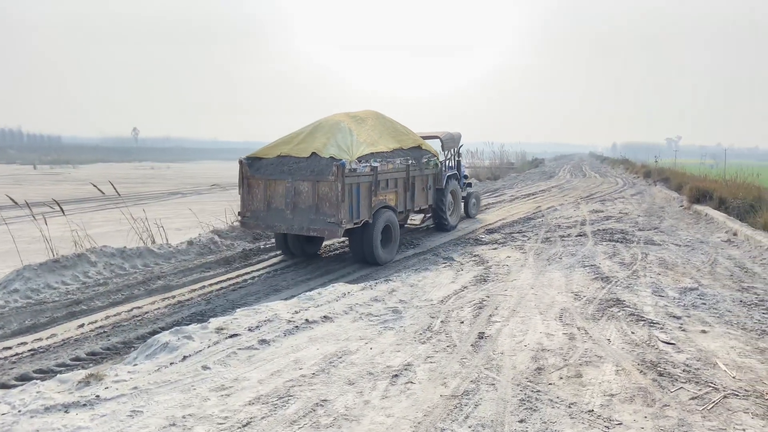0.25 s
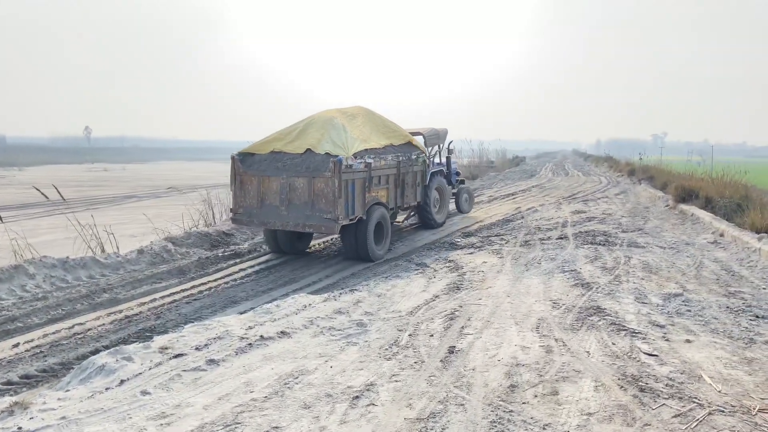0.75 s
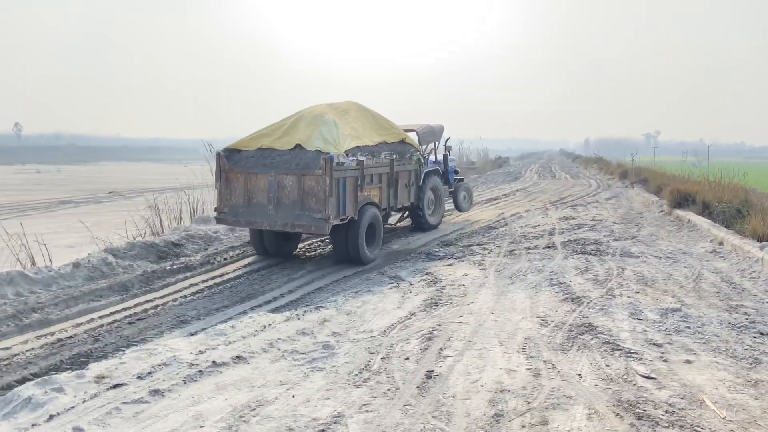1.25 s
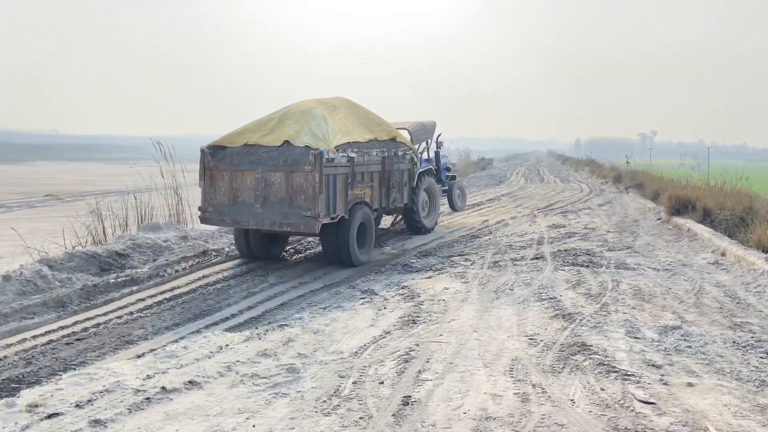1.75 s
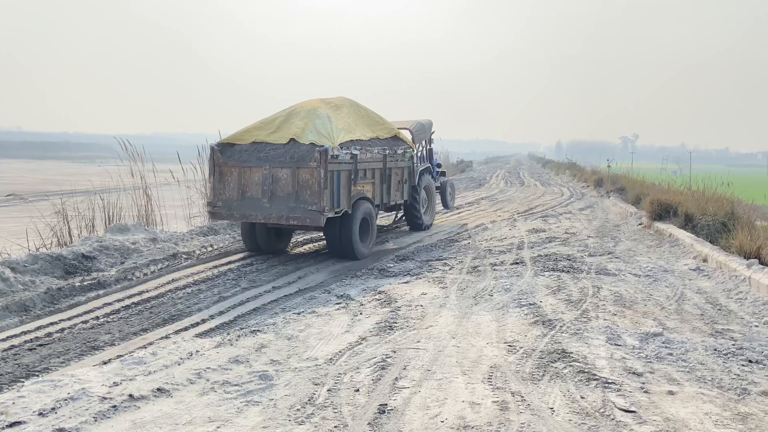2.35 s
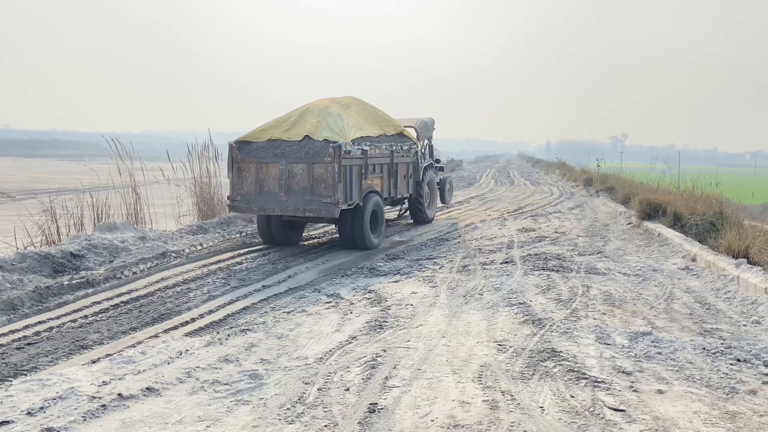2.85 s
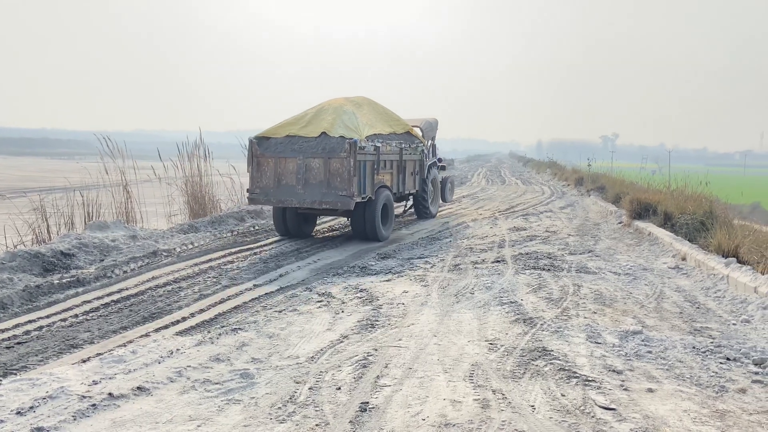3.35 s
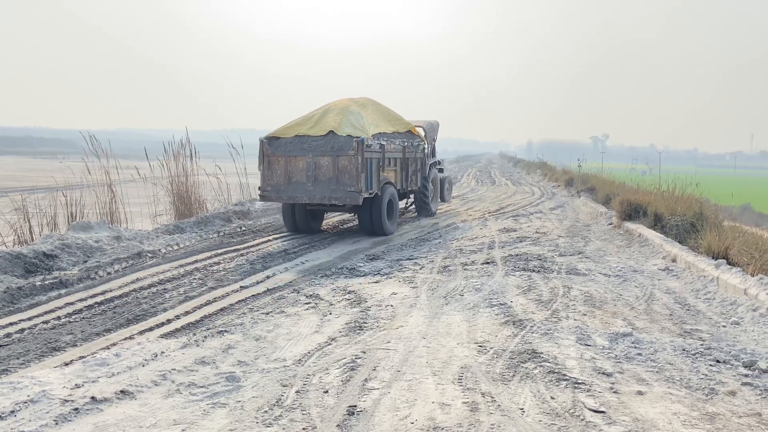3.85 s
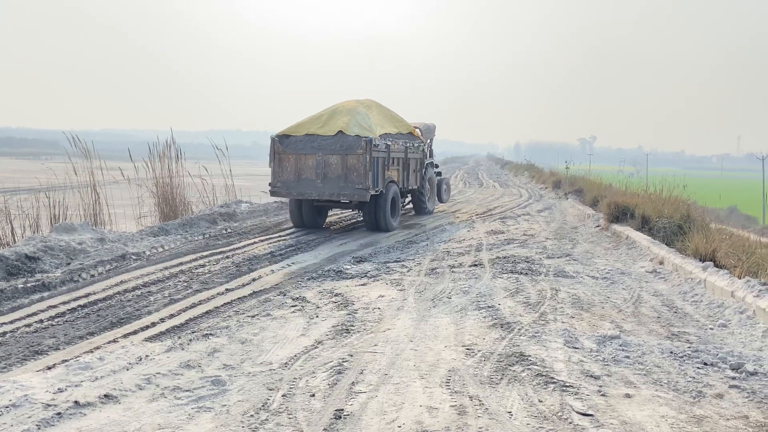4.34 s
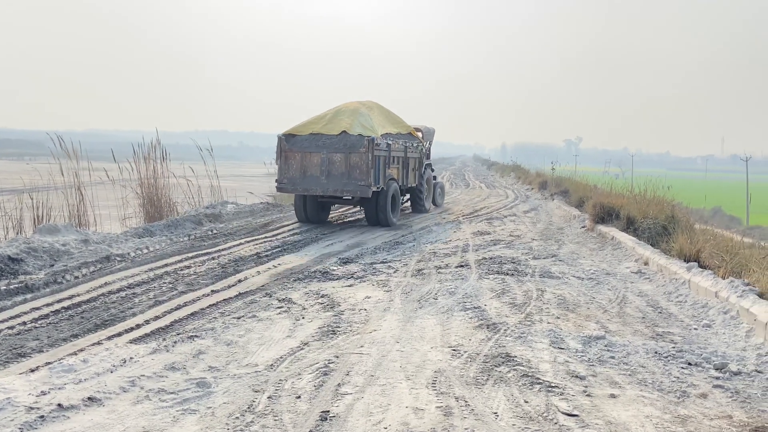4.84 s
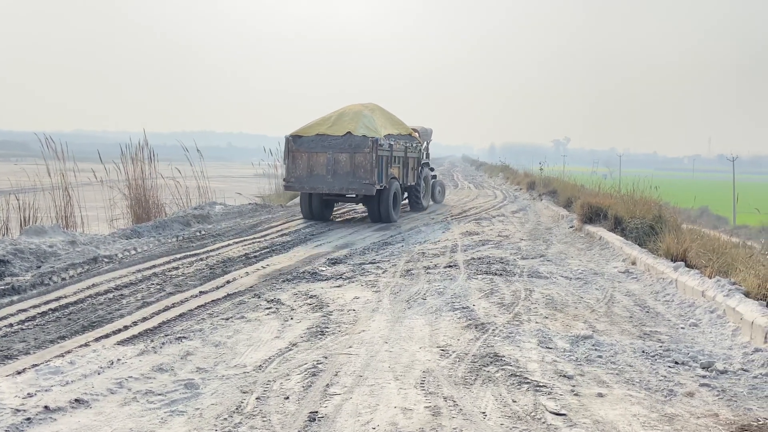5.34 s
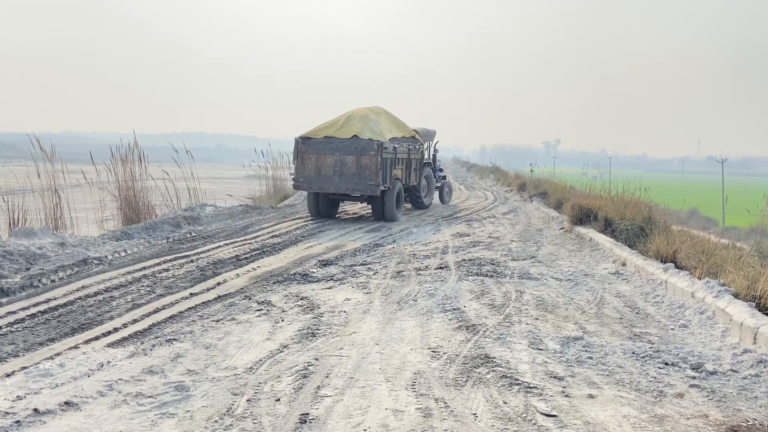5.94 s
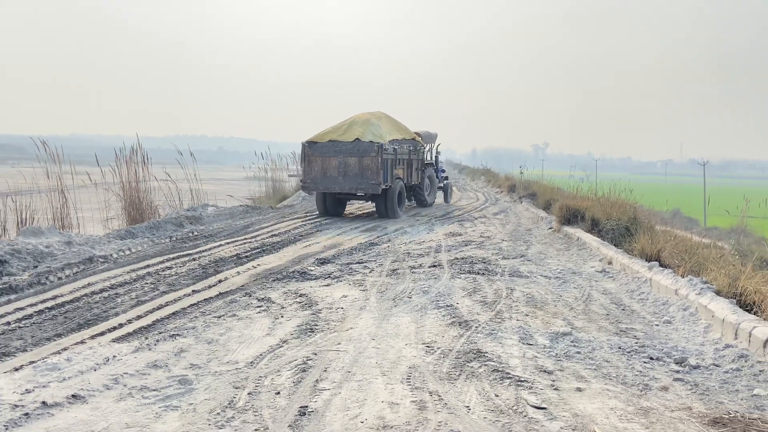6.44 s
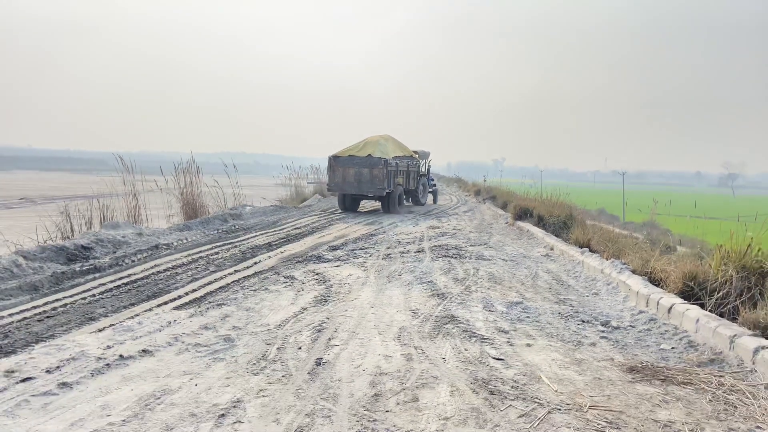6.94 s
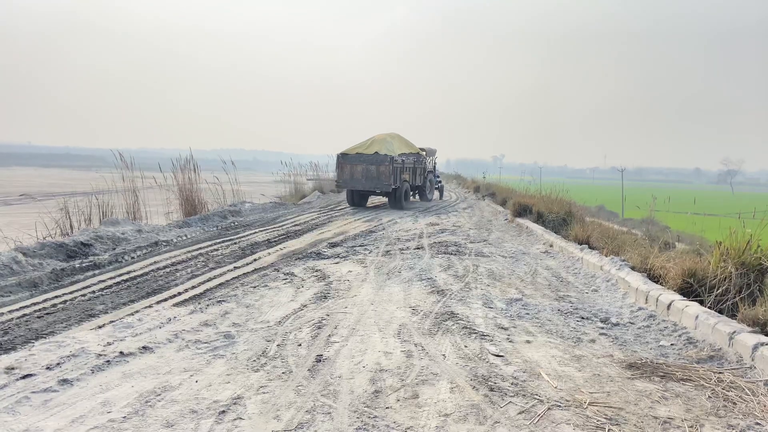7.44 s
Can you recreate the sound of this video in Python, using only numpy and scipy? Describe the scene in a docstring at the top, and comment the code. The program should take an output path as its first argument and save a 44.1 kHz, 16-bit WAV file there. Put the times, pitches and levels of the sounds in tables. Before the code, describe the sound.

A diesel tractor chugs and clatters as it hauls a trolley away, slowing and fading, with metal clicks and light wind.

```python
"""On a dusty embankment in open country, a three-cylinder diesel tractor hauls a loaded trolley away.
Each firing excites the exhaust, which booms, cracks and rasps, and the block, which knocks and clatters;
fan and gears add tones and a steel panel buzzes. The sound weakens with distance and changes colour as
the trolley screens the engine. After five seconds the engine sags and ticks, then pulls at lower speed
with hard ringing knocks. Metal clicks and clanks now and then; light wind buffets the microphone."""
import sys
import numpy as np
from scipy import signal
from scipy.fft import rfft, irfft, next_fast_len
from scipy.io import wavfile

SR = 44100
rng = np.random.default_rng(int(sys.argv[2]) if len(sys.argv) > 2 else 0)


def unload_wav(signal):
    """Save mono or channel-first audio to the path in sys.argv[1] as 16-bit WAV at rate SR, clipped to [-1, 1]."""
    wavfile.write(
        sys.argv[1],
        SR,
        np.round(np.clip(np.atleast_2d(signal).T, -1, 1) * 32767).astype(np.int16),
    )


N = 339084
T = np.arange(N) / SR
FFT_SIZE = next_fast_len(N, real=True)
BINS_HZ = np.arange(FFT_SIZE // 2 + 1) * SR / FFT_SIZE

CYLINDERS = 3  # firings per four-stroke cycle; one "turn" of phase is one firing
FREE_HZ, LUGGING_HZ = 55.05, 46.53  # firing rates, running freely and lugging
LUG_DELAY_TURNS = .13  # knock and crack come later when lugging

# engine speed: (time [s], firing rate [Hz])
FIRING_RATE = [(0.0, 57.06), (0.7, 53.67), (1.1, 53.28), (1.5, 53.25), (2.0, 53.69), (3.0, 54.25),
               (3.4, 54.26), (3.8, 55.71), (4.3, 56.04), (4.7, 54.17), (5.15, 53.05), (5.45, 50.1),
               (5.7, 46.5), (5.85, 45.6), (6.1, 46.0), (6.36, 43.7), (6.55, 44.7), (6.88, 44.8),
               (7.1, 46.1), (7.3, 46.2), (7.48, 46.8), (7.69, 46.2)]
# the driver eases off, then pulls again: (time [s], load [dB])
ENGINE_LOAD = [(0, -2), (1, 0.5), (1.65, 4), (4.15, 2), (4.55, 1), (5.1, 5), (5.26, -6), (5.7, -11),
               (6.05, -4), (6.3, -3.5), (6.55, 0.5), (7, 0.5), (7.3, 2), (7.69, -11)]
# screening of the engine by the trolley: (time [s], share hidden [0-1])
SCREENING = [(4.38, 0.26), (4.5, 0.58), (4.95, 0.74), (5.3, 0.74)]
# bearing, a little to the right at first and last: (time [s], share off axis [0-1])
OFF_AXIS = [(0, 1), (.85, 1), (1.6, .2), (2.6, 0), (6.1, 0), (6.5, .6), (7.3, 1)]

# gain laws: (base level [dB], gain in view [dB], gain hidden [dB], gain lugging [dB], load slope [dB/dB])
MUFFLER_GAINS = (-28, -1, 1.5, -4, 0.12)
CRACK_GAINS = (-38, 2, -8, -3, 0.1)
HISS_GAINS = (-38.5, 3, -6, -0.5, 0.2)
CLATTER_GAINS = (-35, 0, -4.5, -0.5, 0.23)
WHINE_GAINS = [(-35, 1.1, -8.5, 0, 0.32), (-56.5, 1.3, -4, 14, 0.7), (-56.5, 3, -6, 10, 0),
               (-50.5, 13.8, -9, 12.5, 0.1), (-57, 9, -2, 2.5, 0.29)]  # one row for the fan, four for the gears
# passing rates of the fan blades and four gear meshes: (multiple of the firing rate [1])
WHINE_ORDERS = [5.625, 12.67, 13.7, 14.68, 24.35]

# low exhaust harmonics: (time [s], fundamental [dB], octave [dB], twelfth [dB])
BOOM_LEVELS = [(0, -20, -23.5, -33), (.6, -24, -22, -39), (1.3, -21, -21.5, -31), (1.55, -21, -18, -36),
               (2.1, -21.5, -19.5, -48), (3.3, -21.5, -20, -45), (4.35, -22, -21, -50),
               (4.55, -26, -23, -51), (5.1, -25, -22, -51), (5.26, -42, -35, -36), (5.5, -30, -54, -43.5),
               (5.75, -35, -36, -36.5), (6, -41, -27.5, -33), (6.35, -35, -25, -31),
               (6.52, -37, -23.5, -34), (7, -49, -23.5, -27.5), (7.3, -54, -27, -32),
               (7.69, -42, -27.5, -32.5)]
# higher exhaust harmonics: (multiple of the firing rate [1], then the five columns of a gain law)
EXHAUST_OVERTONES = [(4, -40, 2.5, -6.5, -3.5, -0.6), (5, -49.5, 5, 1.5, 7.5, -0.3),
                     (7, -46, 0.5, 7.5, -5, 1)]
# lines from unequal cylinders: (multiple of the four-stroke cycle rate [1], level [dB])
IMBALANCE_LINES = [(4, -36), (5, -36.5), (7, -34.5), (11, -39), (18, -46), (31, -52), (34, -51.5)]
# sharpness of combustion: (time [s], rasp level before spreading loss [dB])
RASP_LEVEL = [(0, -40), (.4, -44), (.85, -39), (1.03, -35), (1.25, -38), (2.1, -41), (2.62, -39),
              (2.84, -42), (3.05, -37.5), (3.35, -46), (3.65, -39.5), (4.38, -45), (4.52, -47.5),
              (4.97, -49), (5.2, -61), (6.27, -63), (6.38, -44.5), (6.5, -39.5), (6.8, -40.5),
              (7.03, -37.5), (7.25, -50), (7.69, -68)]
# diesel knock, hardest where the engine labours: (time [s], level [dB])
KNOCK_LEVEL = [(0, -52), (1.1, -44.5), (2.5, -46), (3.7, -42.5), (4.2, -41), (4.5, -52), (4.72, -45),
               (5.3, -55), (6.2, -49), (6.45, -44), (6.98, -47), (7.6, -58)]

# spectra in the open and behind the trolley: (frequency [Hz], relative level [dB])
MUFFLER_OPEN = [(25, -32), (70, -40), (130, -1.5), (200, 0.5), (260, -6.5), (340, -4.5), (420, -8),
                (520, -17), (800, -28.5), (3000, -94)]
MUFFLER_HIDDEN = [(25, -38), (70, -47), (130, 0), (190, 1), (260, -4.5), (340, -7.5), (440, -11.5),
                  (520, -19.5), (800, -21), (3000, -104)]
RASP_OPEN = [(150, -28), (700, 2.5), (1400, -5), (2100, 1), (2550, -8), (3050, 6), (3450, 0), (4130, -2),
             (4600, -1.5), (5000, 3), (5700, -1.5), (7000, 0), (8500, -8), (11500, -5.5), (15500, -20.5)]
RASP_HIDDEN = [(150, -17), (700, -20), (1380, 14.5), (1950, -9), (2500, 8), (3000, 2), (3850, 10.5),
               (4500, 5), (5200, 3), (8000, -1), (11500, -10.5), (15500, -22)]
HISS_OPEN = [(300, -10), (1500, 4.5), (2400, -2), (3100, 1), (3500, 3), (4050, -1), (4600, -2.5),
             (8500, -7.5), (11500, -9.5), (15500, -25)]
HISS_HIDDEN = [(300, -4), (1500, 2), (3100, 2), (4000, 2.5), (4600, -2), (8500, -13), (11500, -21),
               (15500, -29)]
BLOCK_OPEN = [(100, -40), (350, -14), (520, -5.5), (600, 1), (800, 0.5), (890, 5), (980, -7), (1080, 0),
              (1280, -3.5), (1550, -6), (1850, -4), (2050, -12), (2300, -8), (3500, -23), (9000, -77)]
BLOCK_HIDDEN = [(100, -48), (350, 7), (500, 5.5), (800, 1.5), (970, -4.5), (1100, 1), (1400, 0.5),
                (1550, -9), (1780, 0), (2050, -11), (2300, -1.5), (3300, -23.5), (9000, -77)]

# modes of stack and block: (frequency [Hz], bandwidth [Hz], weight in the open [dB], weight hidden [dB])
STACK_RESONANCES = [(671, 108, -2.5, 1), (800, 103, 2, -1), (1163, 114, -4, -10)]
BLOCK_RESONANCES = [(1353, 120, -2, 4.5), (1827, 154, 3, -15), (2410, 270, -8, 0.5), (2980, 240, -0.5, -21)]
# buzz of the steel panel: (time [s], ring frequency [Hz], drive relative to the rasp [dB])
PANEL_BUZZ = [(0, 4066, 1), (.6, 4170, 2.5), (1.05, 4155, 1.5), (1.45, 4080, 1.5), (1.85, 4077, -10),
              (2.5, 4120, -0.5), (3, 4050, -2.5), (3.6, 4050, 0), (3.9, 4030, 2), (4.5, 4015, 0.5),
              (4.75, 3850, 1), (5.2, 3850, 5), (5.6, 3850, -9), (6.42, 3736, 1), (6.9, 3940, -2),
              (7.4, 3870, 2)]
# modes of the panel: (multiple of the ring frequency [1], weight [dB])
PANEL_RESONANCES = [(.74, -7.5), (1, 2), (1.2, -5)]

# spectrum of the breeze: (frequency [Hz], relative level [dB])
BREEZE_SPECTRUM = [(20, -19), (35, -6), (50, 11.5), (80, 4), (130, 4), (200, -15), (400, -55), (2000, -100)]
# sharp metallic clicks and clanks, then hard ringing knocks as the engine pulls again:
# (time [s], level [dB], ring frequency [Hz], decay [s], spread [log Hz])
METAL_IMPACTS = [(0.611, -27, 7000, 0.003, 0.56), (.631, -31, 7000, 0.0033, .5),
                 (3.049, -39, 9500, 0.0044, 0.22), (3.566, -35, 2750, 0.016, .1),
                 (4.945, -31, 560, 0.052, 0.8), (4.96, -41, 3300, 0.022, .2), (5.36, -50, 7100, .03, .04),
                 (6.289, -36.5, 2600, 0.026, 0.44), (6.419, -36, 2450, 0.014, .16),
                 (6.506, -37, 2697, .009, .3), (6.884, -31, 4130, .006, 0.045),
                 (6.907, -23, 4030, 0.0055, .04), (6.974, -30, 4140, .005, 0.13)]
# wind buffets: (time [s], half-width [s], level [dB], centre frequency [Hz])
BUFFETS = [(3.155, 0.055, -23, 100), (3.68, 0.03, -21.5, 80), (3.888, 0.1, -20.5, 74),
           (4.078, 0.069, -18.5, 92.5), (4.436, 0.042, -19, 84), (5.057, 0.065, -30, 65.5),
           (5.4, 0.11, -28, 60.6), (6.182, 0.015, -12, 99), (6.56, 0.044, -21, 82), (6.9, .25, -35, 50)]

# diffraction round the microphone body, off axis: (frequency [Hz], lag at the left port [cycles])
DIFFRACTION_LAG = [(400, 0), (1600, .04), (2000, .45), (2230, .22), (2500, .43), (2850, .08), (3400, .22),
                   (4400, .11), (5500, .2), (6600, .05), (7600, .22), (10000, .1), (11000, 0)]
# level mismatch of the two microphone ports: (frequency [Hz], left minus right [dB])
PORT_LEVEL = [(100, 0.55), (380, 1), (700, 1.6), (1300, 3), (2300, 4.7), (3500, .7), (4400, -2), (8000, 0)]
# their phase mismatch: (frequency [Hz], lead of the left port [cycles])
PORT_PHASE = [(1500, 0), (2050, .22), (2400, .1), (2800, -.05), (4000, 0), (7300, 0), (8000, -.2),
              (8950, -.5), (9600, -.6), (10600, -1), (11600, -1), (12500, -1.42), (13800, -1.52),
              (14600, -2)]


def undb(db):
    """Amplitude ratio of a level in decibels."""
    return 10 ** (np.asarray(db) / 20)


def curves(table):
    """Linear interpolation of a table's columns in time."""
    times, *columns = np.transpose(table)
    return [np.interp(T, times, column) for column in columns]


def across(points):
    """Interpolation of (frequency, value) points over log frequency."""
    hz, value = np.transpose(points)
    return np.interp(np.log(BINS_HZ + 1), np.log(hz), value)


def filtered(x, response):
    """Linear filtering: the spectrum times a frequency response."""
    return irfft(rfft(x, FFT_SIZE) * response, FFT_SIZE)[:N]


def shaped(x, response):
    """Linear filtering, normalised to rms 1."""
    y = filtered(x, response)
    return y / np.std(y)


def colour(x, spectrum):
    """Spectral shaping by a table of levels; rms 1."""
    return shaped(x, undb(across(spectrum)))


def noise():
    """Gaussian white noise."""
    return rng.standard_normal(N)


def walk(bandwidth_hz):
    """Random fluctuation: low-passed noise of rms 1."""
    return shaped(noise(), np.exp(-(BINS_HZ / bandwidth_hz) ** 2))


def puffs(turns, rise, fall, scatter_db):
    """Pulse modulation: one uneven swell and decay a firing (rise, fall in turns); rms 1."""
    phase = turns % 1
    strengths = undb(scatter_db * np.sqrt(3) * rng.uniform(-1, 1, N // 100))
    envelope = (1 - np.exp(-(phase / rise) ** 2)) * np.exp(-phase / fall) * strengths[turns.astype(int)]
    return envelope / np.sqrt(np.mean(envelope ** 2))


def cyclic_noise(turns, share, drift_hz, size=2048):
    """Partial periodicity: a share of the power recurs each engine cycle in a drifting pattern."""
    place = (turns / CYLINDERS % 1) * size
    first, second = (np.interp(place, np.arange(size), rng.standard_normal(size)) for _ in range(2))
    angle = walk(drift_hz)
    pattern = first * np.cos(angle) + second * np.sin(angle)
    return np.sqrt(share) * pattern + np.sqrt(1 - share) * noise()


def lugging():
    """Speed droop: how far the engine has fallen below its free speed, 0-1."""
    firing_hz, = curves(FIRING_RATE)
    return np.clip((FREE_HZ - firing_hz) / (FREE_HZ - LUGGING_HZ), 0, 1)


def spreading_db(start_m=16, speed_m_s=1.08):
    """Spherical spreading: pressure falls inversely with distance."""
    return -20 * np.log10(1 + speed_m_s * T / start_m)


def gain_law(base_db, view_db, hidden_db, lugging_db, load_slope, lug_power=1):
    """Levels add in decibels: distance, directivity, screening, speed and load set a part's gain."""
    in_view = np.exp(-((T - 1.28) / 0.84) ** 2)  # the engine's open side briefly faces the listener
    hidden, = curves(SCREENING)
    load_db, = curves(ENGINE_LOAD)
    path_db = spreading_db() + view_db * in_view + hidden_db * hidden
    effort_db = lugging_db * lugging() ** lug_power + load_slope * load_db
    return undb(base_db + path_db + effort_db)


def screened(x, open_spectrum, hidden_spectrum):
    """Acoustic shadow: the spectrum changes as the trolley hides the engine."""
    hidden, = curves(SCREENING)
    return (1 - hidden) * colour(x, open_spectrum) + hidden * colour(x, hidden_spectrum)


def ringing(x, modes):
    """Modal superposition: x drives resonances of alternating sign, reweighted behind the trolley."""
    hz, widths, *weights_db = np.transpose(modes)
    responses = np.array([(-1) ** k * 1j * BINS_HZ * w / (f ** 2 - BINS_HZ ** 2 + 1j * BINS_HZ * w)
                          for k, (f, w) in enumerate(zip(hz, widths))])
    in_open, behind = (shaped(x, undb(db) @ responses) for db in weights_db)
    hidden, = curves(SCREENING)
    return (1 - hidden) * in_open + hidden * behind


def wide(source, *controls, side_db):
    """Decorrelation, as by scattering off rough ground: a second draw reaches the ports in antiphase."""
    return source(*controls) + undb(side_db) * source(*controls) * np.array([[1], [-1]])


def exhaust_boom(turns):
    """Periodic gas pulses radiate harmonics of the firing rate; unequal cylinders add lines between."""
    gains = undb(curves(BOOM_LEVELS))
    boom = overtones = lope = 0
    for k, gain in enumerate(gains, 1):
        flutter_db = (0.5 + 0.64 * lugging()) * walk(31) + .5 * walk(3.1)
        boom -= gain * undb(flutter_db) * np.cos(2 * np.pi * k * turns)
    for k, *law in EXHAUST_OVERTONES:
        gain = gain_law(*law) * undb(1.3 * walk(19))
        overtones += gain * np.sin(2 * np.pi * (round(k) * turns + rng.random()))
    for k, db in IMBALANCE_LINES:
        gain = undb(db + 1.3 * walk(2.0))
        lope += gain * np.sin(2 * np.pi * (round(k) * turns / CYLINDERS + rng.random()))
    lope *= np.sqrt(gains[0] / gains[0].max())  # fades with the fundamental
    return np.sqrt(2) * (boom + overtones + lope)


def muffler_rumble(turns):
    """Turbulence: gas churns in the muffler, partly alike in every cycle."""
    churn = cyclic_noise(turns, share=0.31, drift_hz=0.69)
    return screened(churn, MUFFLER_OPEN, MUFFLER_HIDDEN) * gain_law(*MUFFLER_GAINS)


def exhaust_crack(turns, delay_turns=.3, jitter_turns=.005, scatter_db=3.5):
    """Impulse response: each exhaust valve opens with a blow that rings the stack."""
    valve_turns = turns - delay_turns - LUG_DELAY_TURNS * lugging()
    firings = np.arange(1, int(valve_turns[-1]))
    lateness, strength = rng.standard_normal((N // 100, 2))[firings].T
    samples = np.interp(firings + jitter_turns * lateness, valve_turns, np.arange(N))
    blows = np.bincount(samples.astype(int), undb(scatter_db * np.clip(strength, -1, 1)), N)
    return ringing(blows, STACK_RESONANCES) * gain_law(*CRACK_GAINS)


def rasp_and_hiss(turns, rasp_db):
    """Modulated noise: each firing lets off a grainy burst over the hiss of fan and tyres in dust."""
    lug = lugging()
    grain = noise() * undb(walk(500))
    bursts = grain * puffs(turns + 0.1 * (1 - lug), rise=0.33, fall=0.24 - 0.03 * lug, scatter_db=2.0)
    rasp = screened(bursts, RASP_OPEN, RASP_HIDDEN) * undb(rasp_db)
    hiss = noise() * undb(1.1 * walk(530) + walk(4.1))
    return rasp + screened(hiss, HISS_OPEN, HISS_HIDDEN) * gain_law(*HISS_GAINS)


def diesel_knock(turns, delay_turns=0.242):
    """Shock excitation: combustion rings the block's modes, differently every time."""
    hits = puffs(turns - delay_turns - LUG_DELAY_TURNS * lugging(), rise=.03, fall=.1, scatter_db=2.6)
    knock_db, = curves(KNOCK_LEVEL)
    return ringing(np.sign(noise()) * hits, BLOCK_RESONANCES) * undb(knock_db)


def block_clatter(turns, rasp_db):
    """Structure-borne noise: valve gear and pistons rattle the block; harder firing deepens the pulse."""
    depth = np.clip(0.34 + 0.22 * lugging() + 0.011 * (rasp_db - rasp_db.max()), 0, 1)
    pulses = puffs(turns, rise=0.17, fall=0.16, scatter_db=3.5)
    envelope = np.sqrt(1 - depth ** 2 + (depth * pulses) ** 2)
    rattle = cyclic_noise(turns, share=0.28, drift_hz=0.56) * envelope
    return screened(rattle, BLOCK_OPEN, BLOCK_HIDDEN) * gain_law(*CLATTER_GAINS)


def fan_and_gears(turns):
    """Blade passage and tooth meshing give wavering tones proportional to engine speed."""
    tones = 0
    for order, law in zip(WHINE_ORDERS, WHINE_GAINS):
        # cubed: lugging lifts the gears only once the engine is well down
        gain = gain_law(*law, lug_power=3) * undb(1.9 * walk(12))
        tones += gain * np.sin(2 * np.pi * order * turns + 0.28 * walk(9))
    return np.sqrt(2) * tones


def panel_buzz(turns, rasp_db, width_hz=220, flex_share=0.011):
    """Forced vibration: firings shake a thin steel panel, whose three modes shift as it flexes."""
    hz, drive_db = curves(PANEL_BUZZ)
    angle = 2 * np.pi * np.cumsum(hz * (1 + flex_share * walk(12))) / SR
    ring = 0
    for ratio, db in PANEL_RESONANCES:
        gain = undb(db + 1.5 * walk(6.8))
        ring += gain * (walk(width_hz) * np.cos(ratio * angle) + walk(width_hz) * np.sin(ratio * angle))
    shaking = 0.092 + 0.5 * puffs(turns, rise=0.084, fall=0.54, scatter_db=2.0)
    return ring * shaking * undb(rasp_db + drive_db)


def breeze():
    """Turbulent pressure: light wind rumbles on the microphone."""
    rumble = wide(lambda: colour(noise(), BREEZE_SPECTRUM), side_db=-9.0)
    return rumble * undb(-33.5 + 1.1 * walk(5.3))


def metal_impacts(attack_s=0.00043):
    """Damped free vibration: each metallic click, clank or hard engine knock rings round one pitch."""
    impacts = np.zeros(N)
    for start_s, db, hz, decay_s, spread in METAL_IMPACTS:
        detuning = np.log((BINS_HZ + 1) / hz) / spread
        ring = shaped(noise(), (1 + .5 * detuning ** 2) ** -2)
        age = np.maximum(T - start_s, 0)
        impacts += undb(db) * ring * (1 - np.exp(-age / attack_s)) * np.exp(-age / decay_s)
    return impacts


def wind_buffet(middle_s, half_width_s, db, hz, log_spread=0.48):
    """A passing eddy: one swell of low turbulence thumps round its own pitch."""
    eddy = shaped(noise(), np.exp(-(np.log((BINS_HZ + 1) / hz) / log_spread) ** 2))
    return undb(db) * eddy * np.exp(-((T - middle_s) / half_width_s) ** 2 / 2)


def piston_slap(turns, delay_turns=0.616, level_db=-52):
    """Impact noise: while the engine coasts, the pistons tick between the firings."""
    ticks = colour(noise(), RASP_HIDDEN) * puffs(turns - delay_turns, rise=.074, fall=.21, scatter_db=3.5)
    coasting = np.exp(-((T - 5.63) / 0.44) ** 2)
    return ticks * undb(level_db) * coasting


def diffracted(pair):
    """Diffraction: off-axis sound bends round the microphone and reaches the left port late."""
    off_axis, = curves(OFF_AXIS)
    left = 0
    for share in (0, .5, 1):  # crossfade between three bearings
        weight = np.maximum(1 - 2 * np.abs(off_axis - share), 0)
        left += weight * filtered(pair[0], np.exp(-2j * np.pi * share * across(DIFFRACTION_LAG)))
    return np.array([left, pair[1]])


def scene():
    """Superposition of the engine's sounds, timed by one firing phase, with metal impacts and wind."""
    firing_hz, = curves(FIRING_RATE)
    turns = .2 + np.cumsum(firing_hz) / SR
    rasp_db = curves(RASP_LEVEL)[0] + spreading_db()
    drone = exhaust_boom(turns) + fan_and_gears(turns) + wide(muffler_rumble, turns, side_db=-18.0)
    clatter = wide(block_clatter, turns, rasp_db, side_db=-7.5)
    rasp = wide(rasp_and_hiss, turns, rasp_db, side_db=-17)
    metal = panel_buzz(turns, rasp_db) + metal_impacts()
    beats = exhaust_crack(turns) + diesel_knock(turns) + piston_slap(turns)
    wind = breeze() + sum(wide(wind_buffet, *buffet, side_db=-14.5) for buffet in BUFFETS)
    fade = np.minimum(np.minimum(T, T[-1] - T) / .004, 1)
    return diffracted((drone + clatter + rasp + metal + beats) * fade) + wind * fade


def record(dry):
    """Channel mismatch and band limit: the ports differ in level and treble phase; the top is cut."""
    tilt = undb(across(PORT_LEVEL) / 2)
    left = filtered(dry[0], tilt)
    right = filtered(dry[1], np.exp(-2j * np.pi * across(PORT_PHASE)) / tilt)
    low_pass = signal.ellip(10, .2, 80, 15750, fs=SR, output="sos")
    return signal.sosfilt(low_pass, np.array([left, right]))


dry = scene()
out = record(dry)
unload_wav(out)
```